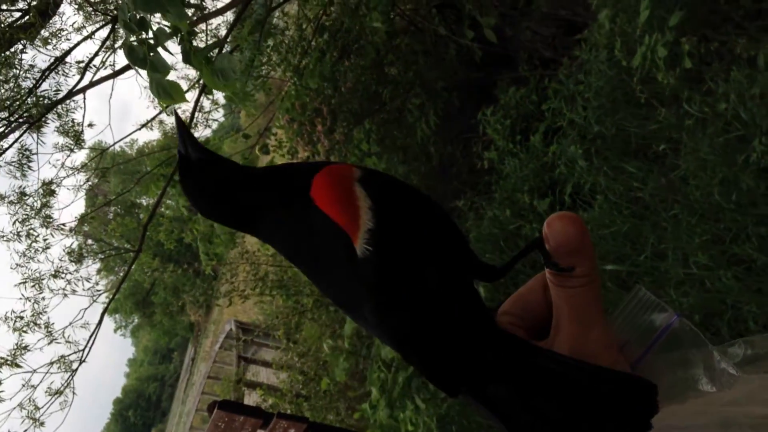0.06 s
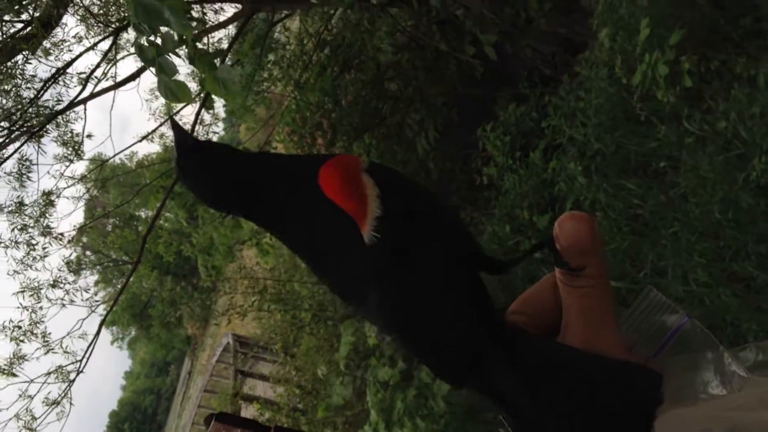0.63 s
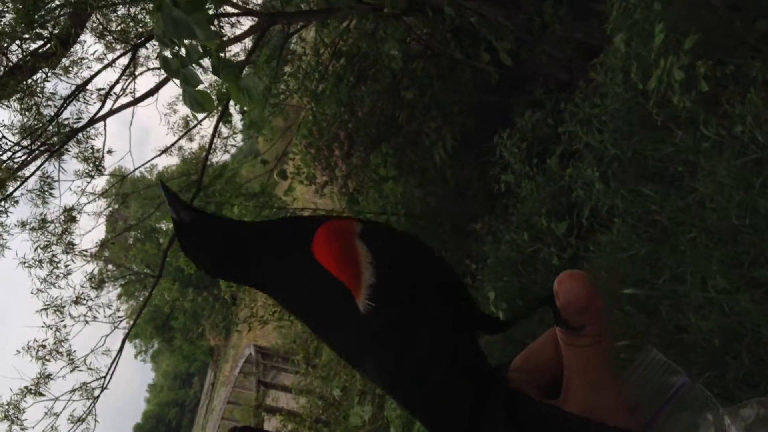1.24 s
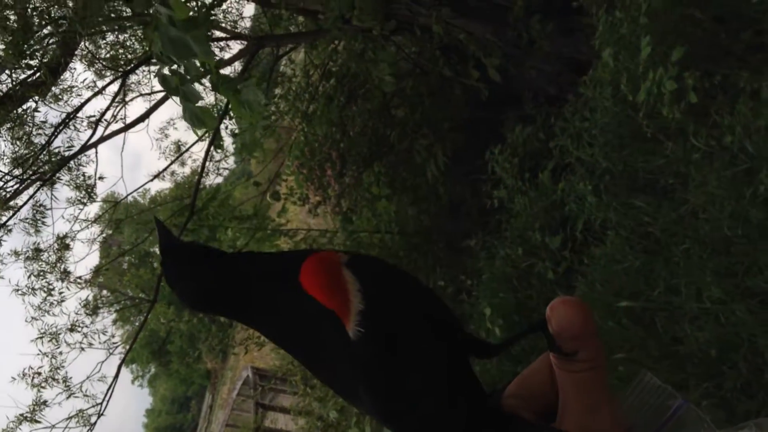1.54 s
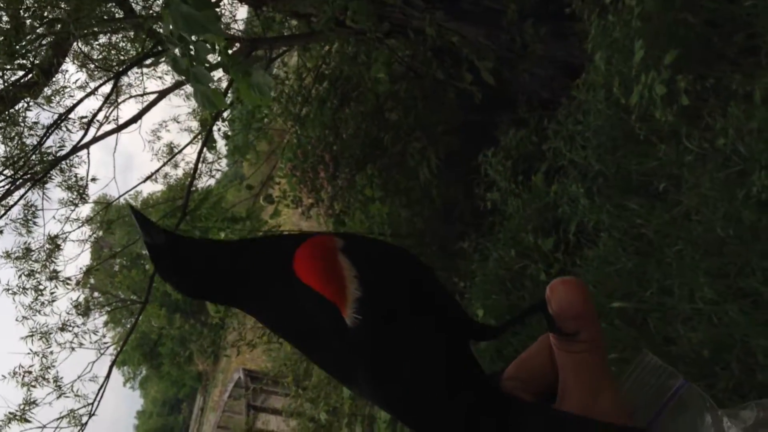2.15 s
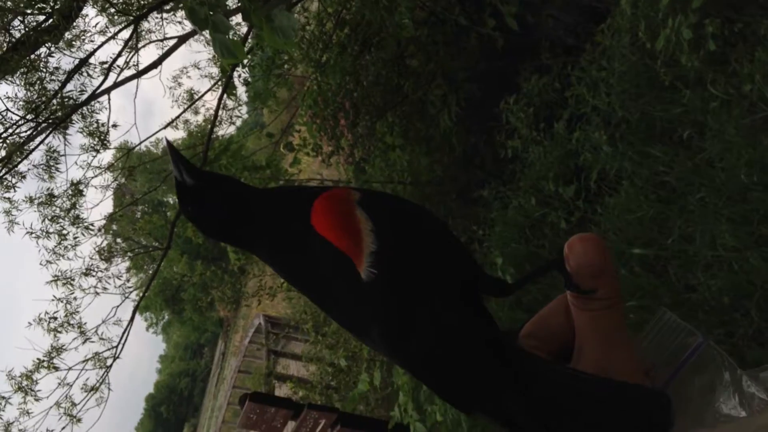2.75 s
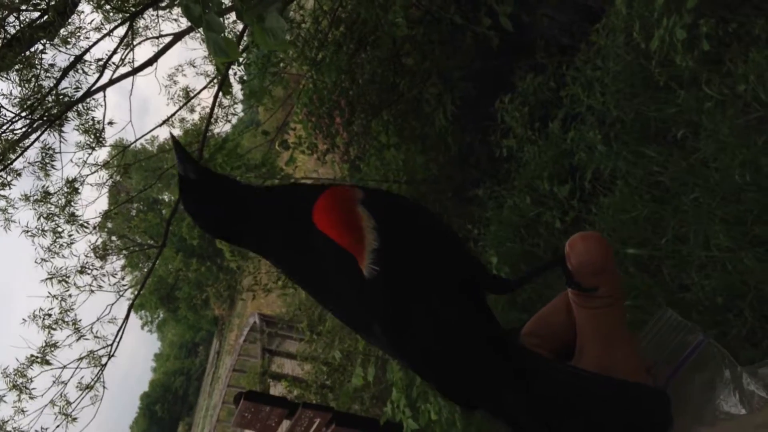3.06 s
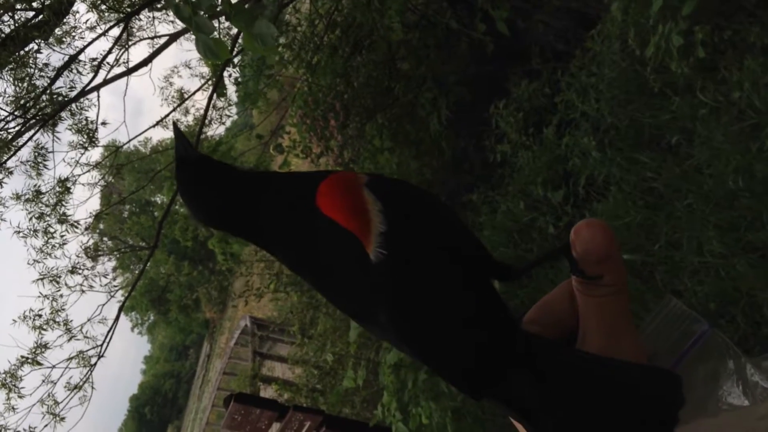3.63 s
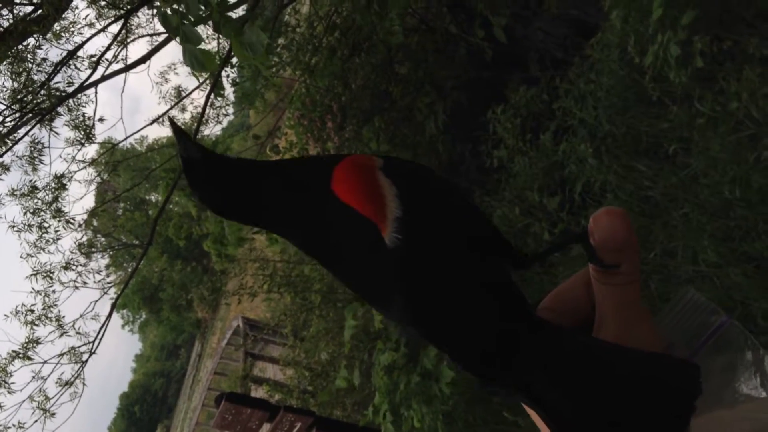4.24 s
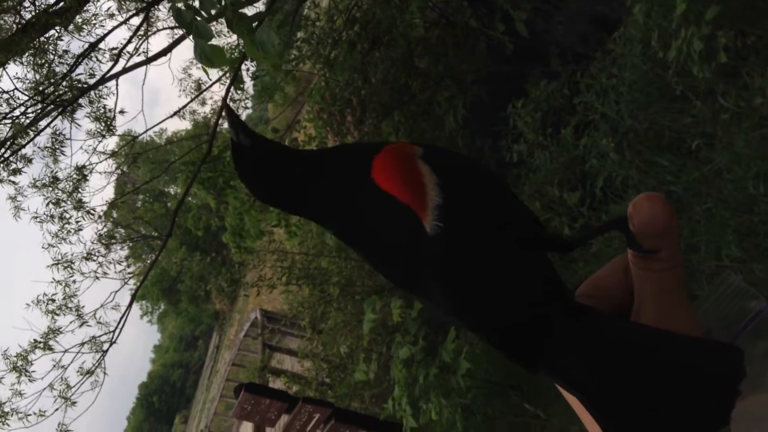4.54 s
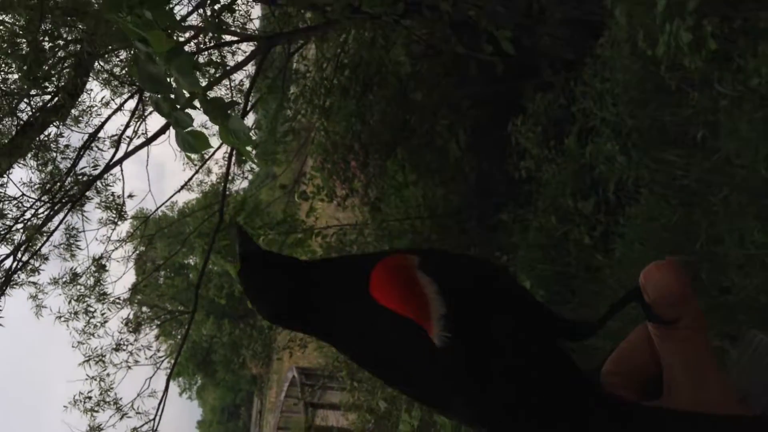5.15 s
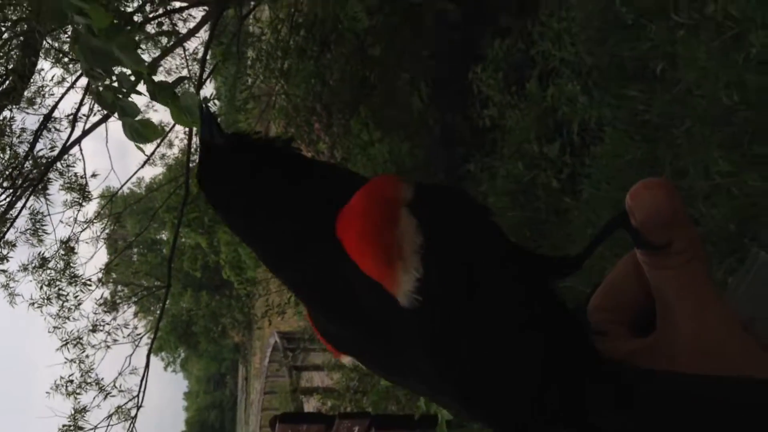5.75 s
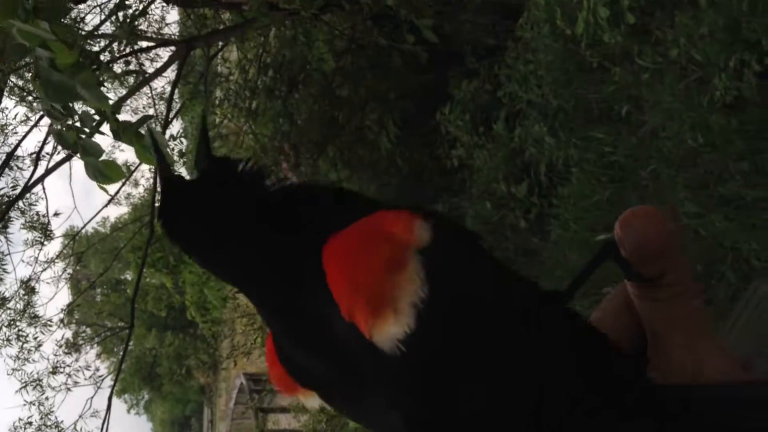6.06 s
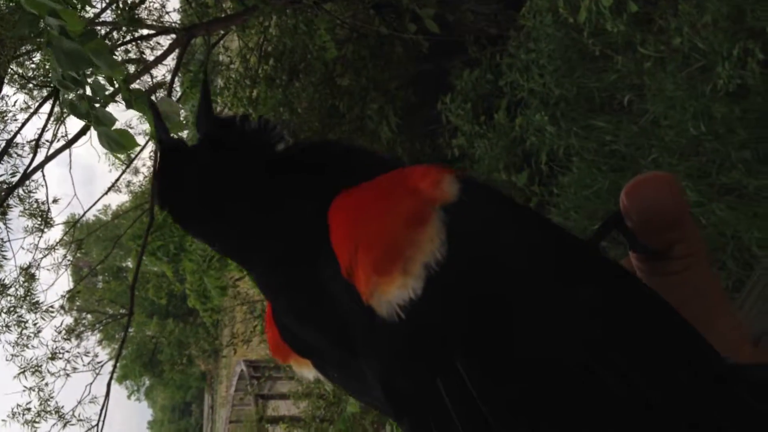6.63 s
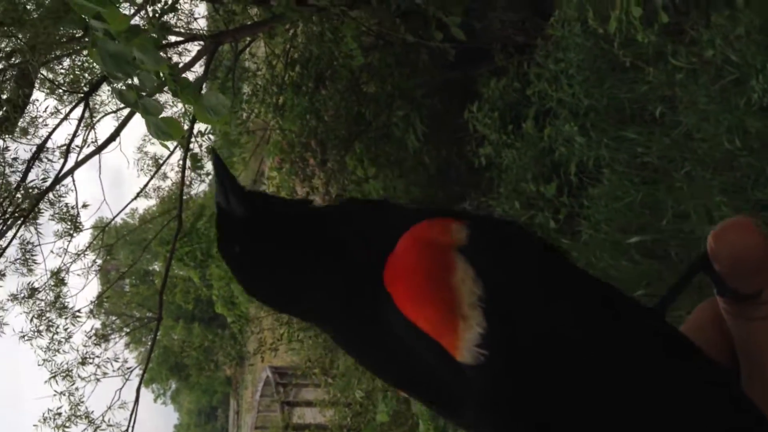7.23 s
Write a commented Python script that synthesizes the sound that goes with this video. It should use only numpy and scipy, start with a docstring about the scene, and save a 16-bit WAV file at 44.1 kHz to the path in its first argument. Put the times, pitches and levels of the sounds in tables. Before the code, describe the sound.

A blackbird very close to the microphone in a park gives a creaky squeal and a loud, stuttering chatter that trails off in thin wheezes. Cloth and plastic rustle softly nearby while a small bird twitters far off in the trees. The blackbird then sings a few liquid notes and a gurgle, breaking into a harsh, buzzy trill. Faint distant traffic hums throughout.

```python
"""Red-winged blackbird in a park

The close bird's syrinx sings twice, switching between whistle and reed tones: a stuttering chatter that
trails off in thin wheezes, then liquid notes and a harsh trill. Turbulence in the beak adds rasp.
Cloth and plastic rustle nearby, a small bird twitters through the trees, distant traffic rumbles."""
import sys
import numpy as np
from scipy import signal
from scipy.fft import rfft, irfft
from scipy.io import wavfile
from scipy.ndimage import uniform_filter1d

SR = 44100
rng = np.random.default_rng(int(sys.argv[2]) if len(sys.argv) > 2 else 0)


def master(y):
    """Save y as 16-bit WAV."""
    cut = np.clip(np.atleast_2d(y).T, -1, 1)
    pcm = np.round(cut * 32767)  # scale
    wavfile.write(sys.argv[1], SR, pcm.astype(np.int16))


N = 321489
TIME = np.arange(N) / SR
# syrinx in its pure mode: relative level/dB of harmonics 1, 2, ...
WHISTLE_TIMBRE = [2.5, -29.5, -35.5, -44.5]


def from_db(db):
    """Decibels to gain."""
    return 10 ** (np.asarray(db) / 20)


def at_hz(spectrum, hz):
    """Level/dB of rows (f/Hz, level/dB), interpolated in log f."""
    f, db = np.transpose(spectrum)
    return np.interp(np.log(np.maximum(hz, 1)), np.log(f), db)


def colour(x, spectrum):
    """Shape x to a spectrum with steep skirts; rms 1."""
    hz = np.arange(N // 2 + 1) * SR / N + 1
    skirts = 1 / (1 + (spectrum[0][0] / hz) ** 8) / (1 + (hz / spectrum[-1][0] / 1.1) ** 16)
    shaped = irfft(rfft(x) * from_db(at_hz(spectrum, hz)) * skirts, N)
    return shaped / np.sqrt(np.mean(shaped ** 2) + 1e-20)


def hiss(spectrum):
    """Coloured noise, rms 1."""
    return colour(rng.standard_normal(N), spectrum)


def wander(t, rate_hz):
    """Smooth random curve, spread about 1."""
    steps = (t - t[0]) * rate_hz
    count = int(steps[-1]) + 2
    return np.interp(steps, np.arange(count), rng.standard_normal(count))


def bursts(rows, rise_db_per_s, fall_db_per_s):
    """Gain of events (t/s, hold/s, level/dB) that rise, hold and fall."""
    return np.max([from_db(db - rise_db_per_s * np.maximum(s - TIME, 0)
                           - fall_db_per_s * np.maximum(TIME - s - hold_s, 0))
                   for s, hold_s, db in rows], axis=0)


def background():
    """Far traffic, one passing engine, faint open-air hiss."""
    # spectra: f/Hz, relative density/dB
    traffic_spectrum = [(18, -69), (30, -39), (59, -36.5), (74, -27), (152, -10), (230, -8), (262, -5.5),
                        (327, -6), (353, -0.5), (417, -6), (441, 0.5), (467, -2.5), (949, -7.5),
                        (1600, -21.5), (2600, -41.5), (3380, -57.5), (5720, -120)]
    engine_spectrum = [(235, -19.5), (266, 6), (290, -14.5), (310, -6.5), (335, -10.5), (440, -8),
                       (480, -24)]
    air_spectrum = [(1500, 1), (2500, -1), (5000, -6), (9000, -7.5), (15300, -5.5)]
    # swells: t/s, relative level/dB
    traffic_swell = [(0.0, -54), (1.36, -54), (2.23, -53.5), (2.56, -53), (4.53, -53.5), (5.89, -53.5),
                     (6.37, -53), (7.02, -53.5), (7.29, -53.5)]
    engine_swell = [(1.9, -81), (2.6, -61.5), (3.3, -54.5), (3.8, -67), (4.5, -61.5), (5.3, -69)]
    traffic = from_db(np.interp(TIME, *np.transpose(traffic_swell)) + 2) * hiss(traffic_spectrum)
    engine_db = np.interp(TIME, *np.transpose(engine_swell), left=-120, right=-120)
    return traffic + from_db(engine_db) * hiss(engine_spectrum) + from_db(-62.5) * hiss(air_spectrum)


def rustle():
    """Dense tiny slips in cloth and plastic, with a few sharp ticks."""
    def slips(spectrum, clump_db):
        return colour(rng.standard_normal(N) * from_db(clump_db * wander(TIME, 500)), spectrum)

    # bursts of slips: t/s, hold/s, level/dB
    rubs = [(.73, .05, -65), (2.26, .14, -54), (2.56, .09, -45.5), (2.72, .42, -61), (3.8, .25, -60),
            (4.6, .21, -63), (5.35, .17, -63), (7.11, .18, -62)]
    crinkles = [(.57, .02, -61), (2.52, .06, -50), (2.595, .035, -43.5), (2.676, .008, -34.5),
                (2.735, .015, -43), (2.83, .032, -47), (2.93, .1, -53), (3.07, .11, -60), (3.225, .15, -53),
                (4.35, .17, -64), (4.57, .065, -53.5), (4.653, .011, -40.5)]
    # ticks: t/s, relative peak/dB
    ticks = [(0.5904, -43), (2.4987, -30), (2.6713, -26), (2.772, -40), (2.823, -40), (2.859, -42),
             (4.35, -43), (4.3997, -43), (4.4307, -43), (4.6608, -38), (4.9126, -30)]
    # spectra: f/Hz, relative density/dB
    rub_spectrum = [(3060, -42.5), (5200, -7), (5970, -11), (8140, -5.5), (10500, -4), (11800, -4),
                    (15000, -10.5)]
    crinkle_spectrum = [(9500, -46), (11000, -9), (12300, 5.5), (13500, -1.5), (15300, -3)]
    tick_spectrum = [(4500, -1.5), (6500, -13), (9000, -4), (12000, 5.5), (15300, 3)]
    rubbing = bursts(rubs, 125, 125) * slips(rub_spectrum, clump_db=3)
    crinkling = bursts(crinkles, 650, 750) * slips(crinkle_spectrum, clump_db=4)
    tick_gain = sum(from_db(db - 4) * np.exp(-np.abs(TIME - s) / .002) * (TIME >= s) for s, db in ticks)
    return rubbing + crinkling + tick_gain * hiss(tick_spectrum)


def syrinx(gesture, timbre_db, syllables=((0, 1, 0),), jitter=.003, rough=.05, throb_hz=0, throb=0):
    """A jittering, optionally throbbing membrane: one gesture per syllable (t/s, pitch ratio, gain/dB)."""
    s, pitch_hz, level_db = np.transpose(gesture)
    t, out = np.arange(s[0], s[-1], 1 / SR), np.zeros(N)
    weights = from_db(timbre_db) / np.sqrt(np.sum(from_db(timbre_db) ** 2) / 2)
    fade = np.clip(np.minimum(t - t[0], t[-1] - t) * 1000, 0, 1)
    valve = 1 - np.clip(throb, 0, 1) * np.sin(np.pi * throb_hz * t) ** 2
    for at_s, ratio, db in syllables:
        hz = ratio * np.interp(t, s, pitch_hz) * (1 + jitter * wander(t, 900))
        phase = 2 * np.pi * np.cumsum(hz) / SR
        tone = sum(weight * np.sin(k * phase + rng.uniform(0, 2 * np.pi)) * (k * hz < SR / 2)
                   for k, weight in enumerate(weights, 1))
        tone *= from_db(np.interp(t, s, level_db) + db) * fade * valve * (1 + rough * wander(t, 1100))
        start = max(round((at_s + t[0]) * SR), 0)
        out[start:start + len(tone)] += tone[:max(N - start, 0)]
    return out


def glide(start_s, attack_s, hold_s, release_s, first_hz, last_hz, db):
    """Gesture that rises, holds and falls on a straight pitch glide."""
    s = start_s + np.cumsum([0, attack_s, hold_s, release_s])
    hz = np.interp(s, s[[0, -1]], [first_hz, last_hz])
    return np.transpose([s, hz, [db - 16, db, db, db - 16]])


def syllable_run(start_s, count, gap_s, hurry, pitch, sag, arch, db, fade_db, arch_db):
    """Syllable rows: hurry and arch cut gap, pitch and level at both ends; sag and fade tilt the run."""
    place = np.linspace(-1, 1, count)
    gaps_s = gap_s * (1 - hurry * np.linspace(-1, 1, count - 1) ** 2)
    times_s = start_s + np.append(0, np.cumsum(gaps_s)) + .0004 * rng.standard_normal(count)
    ratios = pitch - sag * place - arch * place ** 2
    return np.transpose([times_s, ratios, db - fade_db * place - arch_db * place ** 2])


def take_turns(whistles, reed, handover_db):
    """The reedy mode falls silent while the syrinx rings in its loud, pure mode."""
    power = np.abs(uniform_filter1d(whistles ** 2, size=70))
    return whistles + reed / (1 + (power / from_db(handover_db) ** 2) ** 2)


def chatter_opening():
    """Soft hoarse notes, then a creak that tightens into a squeal."""
    # glides: t/s, attack/s, hold/s, release/s, first f/Hz, last f/Hz, level/dB
    soft_note = (.895, .04, .01, .06, 1530, 1570, -49)
    soft_creak = (.935, .015, .015, .15, 645, 610, -52.5)
    undertone = (1.02, .03, .05, .025, 950, 875, -54)
    flick = (1.114, .014, .003, .005, 2150, 2750, -41.5)
    # gestures: t/s, f/Hz, level/dB
    creak = [(1.133, 266, -46), (1.142, 287.6, -34.5), (1.16, 286.7, -31), (1.184, 297, -36),
             (1.204, 303, -40), (1.22, 293, -52.5)]
    squeal = [(1.17, 3000, -54), (1.195, 2850, -34.5), (1.21, 2650, -31.5), (1.235, 2880, -31.5),
              (1.255, 2850, -34), (1.275, 2800, -51.5)]
    # squeal harmonics: relative level/dB
    nasal = [-5.5, 0, -10.5, -7.5, -14]
    # throat and breath spectra: f/Hz, relative level/dB
    throat = [(760, -75), (1300, -41.5), (1510, -38), (2010, -3), (2420, -17.5), (3830, -31), (4270, -51),
              (5450, -56), (6240, -26), (7200, -41), (9360, -69), (15800, -120)]
    breath_spectrum = [(2710, -41), (4600, -20.5), (5160, -8.5), (6090, -4), (6760, -16.5), (8220, -3.5),
                       (9740, -11.5), (10700, 2.5), (11700, -3), (12800, -17), (15200, -14.5)]
    # puffs of air: t/s, hold/s, level/dB
    puffs = [(.935, .015, -51), (1.148, .04, -37.5), (1.21, .01, -28)]
    notes = syrinx(glide(*soft_note), [0, -7, -12], jitter=.014, rough=.52)
    notes += syrinx(glide(*undertone), [0, -18, -14], jitter=.02, rough=.3)
    notes += syrinx(glide(*soft_creak), [1, -20.5, -2.5, 0, -5.5, -16.5, -14], jitter=.02, rough=.3)
    notes += syrinx(glide(*flick), WHISTLE_TIMBRE, jitter=.02)
    notes += syrinx(squeal, nasal, jitter=.054, rough=.5, throb_hz=294, throb=.42)
    notes += syrinx(creak, at_hz(throat, creak[2][1] * np.arange(1, 25)), jitter=.005, rough=.12)
    flutter = 1 + .45 * np.sin(2 * np.pi * creak[3][1] * TIME)
    return notes + bursts(puffs, 560, 480) * hiss(breath_spectrum) * flutter


def beak_rasp(voice, spectrum, start_s, start_db, fade_db_per_s=7):
    """Turbulence in the beak follows the voice and thins as the song goes on."""
    effort = np.sqrt(np.abs(uniform_filter1d(voice ** 2, size=160)))
    gain = from_db(start_db - fade_db_per_s * np.maximum(TIME - start_s, 0))
    return gain * effort * hiss(spectrum)


def chatter():
    """Syllables of reed tone, loud peak and fading slurs, sagging in pitch; low rattles between."""
    # syllables: t/s, gain/dB
    beats = [(1.227, -3.5), (1.315, -0.5), (1.415, 0), (1.517, -0.5), (1.618, -1), (1.725, -1.5),
             (1.833, -2.5)]
    # gestures: t/s from syllable centre, nominal f/Hz, relative level/dB
    reed_onset = [(-.034, 1612, -38.5), (-.022, 1677, -29), (-.017, 1690, -24), (-.008, 1680, -23.5),
                  (-.005, 1660, -28.5)]
    reed_tail = [(-.004, 1680, -36.5), (.008, 1700, -30), (.026, 1670, -29.5), (.042, 1650, -30),
                 (.06, 1620, -39), (.078, 1620, -34.5)]
    peak = [(-.0042, 3560, -23), (-.003, 3483, -14.5), (0, 3385, -16.5), (.003, 3260, -18.5),
            (.005, 3050, -24)]
    slur = [(-.0028, 4000, -32.5), (-.001, 3580, -13.5), (.0005, 3454, -19), (.002, 3250, -20.5),
            (.0045, 3100, -23)]
    rattle = [(-.02, 2803, -29), (-.007, 2507, -28), (-.003, 2740, -13.5), (.001, 2720, -12.5),
              (.005, 2740, -24.5), (.009, 2648, -26), (.02, 2900, -34.5)]
    # reed harmonics: relative level/dB
    reed_timbre = [-39, 2, -1.5, -28, -25.5, -23, -19, -28]
    # beak turbulence: f/Hz, relative density/dB
    rasp_spectrum = [(2200, -13), (2900, 9), (3700, 12), (4200, -3), (5200, 3), (6300, -15), (7500, -25.5),
                     (8500, -8.5), (10600, -23.5), (11800, -10), (13000, -6.5), (15200, -14)]
    start_s, sag_per_s = beats[0][0], .075
    rattle_lead_s, slur_gap_s, slur_fade_db = .0453, .0077, 4
    syllables = [(s, 1.014 - sag_per_s * (s - start_s), db) for s, db in beats]
    rattles = [(s - rattle_lead_s, ratio * 1.03, db - 2.3) for s, ratio, db in syllables[1:]]
    slurs = [(s + (k + 1) * slur_gap_s, ratio, db - k * slur_fade_db)
             for s, ratio, db in syllables for k in range(5)]
    end_fade = np.interp(TIME, [1.87, 1.895], [1, 0])
    reed = syrinx(reed_onset, reed_timbre, syllables, jitter=.012, rough=.32)
    reed += syrinx(reed_tail, reed_timbre, syllables, jitter=.032, rough=.7) * end_fade
    whistles = syrinx(peak, WHISTLE_TIMBRE, syllables, jitter=.008)
    whistles += syrinx(slur, [0, -36], slurs, jitter=.02, rough=.15)
    whistles += syrinx(rattle, [0, -24, -36, -38, -34], rattles,
                       jitter=.012, rough=.1, throb_hz=280, throb=.95)
    voice = take_turns(whistles, reed, handover_db=-18)
    return voice + beak_rasp(voice, rasp_spectrum, start_s, start_db=-7.9)


def wheezes():
    """Six wheezes grow louder over a thin held whistle."""
    # one wheeze: t/s from centre, nominal f/Hz, relative level/dB
    wheeze = [(-.026, 4340, -54), (-.008, 4440, -43.5), (.004, 4570, -39), (.016, 4744, -43),
              (.04, 4560, -53)]
    # its harmonics: relative level/dB
    timbre = [0, -16, -8.5]
    # held whistle: t/s, f/Hz, level/dB
    thin_whistle = [(1.87, 4650, -45), (1.95, 4480, -53), (2.25, 4450, -53), (2.48, 4500, -52),
                    (2.62, 4380, -48), (2.75, 4380, -59), (2.87, 4350, -73)]
    run = syllable_run(start_s=1.965, count=6, gap_s=.1, hurry=.01,
                       pitch=.99, sag=.001, arch=.02, db=-5.4, fade_db=-3.6, arch_db=.5)
    pulses = syrinx(wheeze, timbre, run, jitter=.02, rough=.6)
    return pulses + syrinx(thin_whistle, [0, -22, -16], jitter=.026, rough=.9)


def far_bird():
    """One phrase sung three times among single chirps, blurred by trees."""
    # slurs: t/s (in the phrase, from its start), length/s, first f/Hz, last f/Hz, level/dB
    chirps = [(2.903, .047, 3650, 3120, -63), (3.084, .076, 3000, 2700, -68),
              (3.152, .01, 4700, 3760, -54.5), (3.405, .035, 3700, 3100, -61),
              (4.513, .036, 4250, 4440, -63), (5.36, .035, 4700, 4880, -66), (5.47, .021, 4350, 4620, -56),
              (5.575, .029, 4450, 4580, -58), (6.931, .029, 3700, 4540, -63), (7.11, .059, 4700, 5600, -67),
              (7.2, .037, 4650, 4360, -66)]
    phrase = [(0, .05, 3550, 3900, -64), (.095, .07, 3850, 4450, -63), (.22, .025, 3900, 4900, -61),
              (.25, .03, 4500, 3600, -65)]
    # phrase starts: t/s
    starts_s = [3.145, 3.625, 4.125]
    slurs = chirps + [(start_s + s, *rest) for start_s in starts_s for s, *rest in phrase]
    notes = np.zeros(N)
    for s, length_s, first_hz, last_hz, db in slurs:
        middle = (s + length_s / 2, (first_hz + last_hz) / 2, db)
        gesture = [(s, first_hz, db - 5), middle, (s + length_s, last_hz, db - 7)]
        notes += syrinx(gesture, [0], jitter=.014, rough=.4)
    return notes + from_db(-4.5) * woods(notes, t60_s=1.0)


def trill_opening():
    """Three fluted notes, a squeak and a throbbing gurgle, over hoarse air."""
    # gestures: t/s, f/Hz, level/dB
    first_note = [(5.575, 1136, -60.5), (5.61, 1114, -40), (5.635, 1141, -32), (5.67, 1159, -30),
                  (5.721, 1155, -29.5), (5.726, 1100, -63)]
    low_note = [(5.722, 757, -47.5), (5.732, 758, -39.5), (5.78, 796, -45), (5.843, 770, -41.5),
                (5.852, 750, -65.5)]
    rising_note = [(5.77, 1575, -58.5), (5.82, 1550, -49.5), (5.848, 1480, -33), (5.853, 1460, -53),
                   (5.856, 1515, -23), (5.868, 1560, -28.5), (5.888, 1620, -39), (5.915, 1580, -47.5)]
    squeak = [(5.878, 5140, -55), (5.892, 4920, -48.5), (5.905, 4870, -41.5), (5.916, 4850, -50.5)]
    gurgle_note = [(5.908, 572, -36), (5.925, 568, -22), (5.97, 560, -19.5), (6.02, 555, -19),
                   (6.064, 546, -19), (6.078, 560, -26.5), (6.09, 590, -32), (6.108, 620, -37)]
    # harmonics: relative level/dB
    flute_timbre = [-6, -44, -33.5, -47, -49, -42, -42, -50]
    gurgle_timbre = [-48, -24.5, -8.5, 8, -9.5, -17.5, -29]
    # puffs of air: t/s, hold/s, level/dB
    puffs = [(5.63, .22, -63), (5.925, .165, -44)]
    # breath: f/Hz, relative density/dB
    breath_spectrum = [(2650, -39), (4500, -15.5), (5160, -10.5), (5660, -11), (6200, -5), (7300, -10),
                       (7920, -5), (9320, -15.5), (11400, -2), (12800, -15), (15200, -10)]
    notes = syrinx(first_note, flute_timbre, jitter=.00084, rough=.043)
    notes += syrinx(low_note, [4, -23.5, -24.5, -24, -23, -31.5, -30.5, -16], jitter=.006)
    notes += syrinx(rising_note, [2, -30, -41, -24], jitter=.008, rough=.15)
    notes += syrinx(squeak, [0, -18], jitter=.025, rough=.5)
    gurgle = syrinx(gurgle_note, gurgle_timbre, jitter=.026, rough=.22)
    # each beat opens the throat's main resonance; side tones sound on between beats
    beat_hz = 67.5
    beat = np.cos(np.pi * (TIME - 6.0025) * beat_hz) ** 2
    resonance = signal.sosfiltfilt(signal.butter(2, [1950, 2550], "band", fs=SR, output="sos"), gurgle)
    gurgle -= .99 * (1 - beat) * resonance
    breath = bursts(puffs, 160, 1000) * hiss(breath_spectrum) * (1.2 - .5 * beat)
    return notes + gurgle + breath


def trill():
    """Fast slurs, then a fading trill in which low, high and reedy tones take turns."""
    # gestures: t/s from syllable centre, nominal f/Hz, relative level/dB
    slur = [(-.005, 5100, -25.5), (-.0032, 4400, -16), (-.0015, 3650, -9), (.001, 3410, -4.5),
            (.0028, 3420, -13), (.0042, 3250, -26)]
    low_tone = [(-.004, 2983, -28), (-.0025, 2777, -18), (0, 2770, -15.5), (.003, 2896, -17),
                (.0055, 3077, -25), (.012, 2850, -29.5), (.017, 2760, -31), (.027, 2880, -45)]
    high_tone = [(.0045, 3504, -25), (.007, 3420, -12.7), (.0105, 3320, -13), (.0125, 3330, -21.5),
                 (.0145, 3290, -15)]
    reed_tone = [(.003, 1728, -25.5), (.011, 1688, -28.5), (.017, 1673, -18.3), (.024, 1675, -18.7),
                 (.03, 1730, -22.5), (.033, 1768, -52)]
    # reed tones into and out of the trill: t/s, f/Hz, level/dB
    lead_in = [(6.097, 1774, -36), (6.112, 1760, -30), (6.15, 1721, -23.5), (6.185, 1700, -21.5),
               (6.201, 1670, -20.5), (6.205, 1750, -28)]
    ending = [(6.688, 1690, -33), (6.697, 1710, -27), (6.705, 1670, -29), (6.712, 1660, -52)]
    # reed harmonics: relative level/dB
    reed_timbre = [-17, 3.5, 1.5, -28, -24, -34, -37, -28.5, -24]
    # beak turbulence: f/Hz, relative density/dB
    rasp_spectrum = [(1400, -17), (2300, -13.5), (3000, -2), (3700, 2), (4300, -9.5), (5300, -7.5),
                     (6200, -18), (8500, -17), (11500, -26.5), (13200, -26), (14500, -12.5), (15300, -15.5)]
    start_s = 6.1112
    slurs = syllable_run(start_s, count=10, gap_s=.0086, hurry=.04,
                         pitch=1.01, sag=.022, arch=.012, db=-3.9, fade_db=-.3, arch_db=4.6)
    syllables = syllable_run(start_s=6.2075, count=15, gap_s=.034, hurry=.102,
                             pitch=1.01, sag=.007, arch=.016, db=-3.1, fade_db=1.8, arch_db=1.1)
    whistles = syrinx(slur, WHISTLE_TIMBRE, slurs, jitter=.012, rough=.08)
    whistles += syrinx(low_tone, [0, -31, -34, -44, -35], syllables, jitter=.012, rough=.12)
    whistles += syrinx(high_tone, [0, -25, -31, -38], syllables, jitter=.006, rough=.08)
    reed = syrinx(lead_in, reed_timbre, jitter=.018, rough=.35)
    reed += syrinx(reed_tone, reed_timbre, syllables, jitter=.009, rough=.24)
    reed += syrinx(ending, reed_timbre, jitter=.012, rough=.3)
    voice = take_turns(whistles, reed, handover_db=-16)
    return voice + beak_rasp(voice, rasp_spectrum, start_s, start_db=-12.4)


def woods(x, t60_s):
    """Leaves and trunks scatter a dull, dying tail."""
    t = np.arange(SR) / SR
    tail = rng.standard_normal(len(t)) * from_db(-60 * t / t60_s) * (1 - np.exp(-t / .0074))
    tail = signal.sosfilt(signal.butter(2, 6000, fs=SR, output="sos"), tail)
    return signal.fftconvolve(x, tail / np.sqrt(np.sum(tail ** 2)))[:N]


def scene():
    """Mono mix: the close bird, with its bass cut away, in the park."""
    songs = chatter_opening() + chatter() + wheezes() + trill_opening() + trill()
    blackbird = signal.sosfilt(signal.butter(2, 400, "high", fs=SR, output="sos"), songs)
    scatter = from_db(-30) * woods(blackbird, t60_s=.45)
    return (blackbird + scatter + far_bird() + rustle() + background())[None]


def record(dry):
    """Steep low-pass."""
    cutoff_hz = 15400
    return signal.sosfilt(signal.ellip(12, .2, 80, cutoff_hz, fs=SR, output="sos"), dry)


dry = scene()
out = record(dry)
master(out)
```